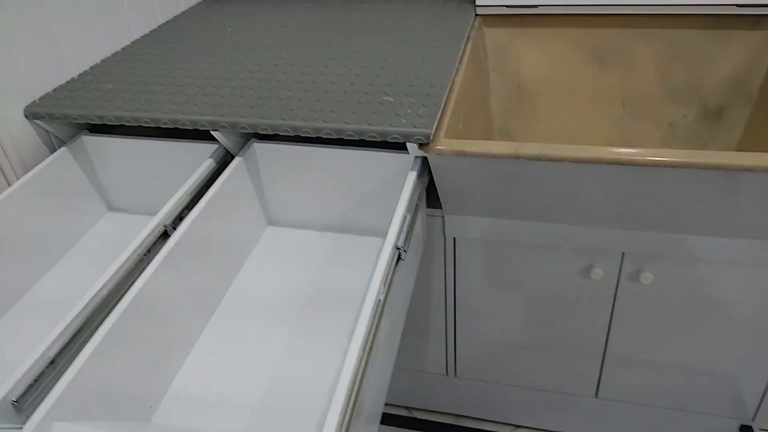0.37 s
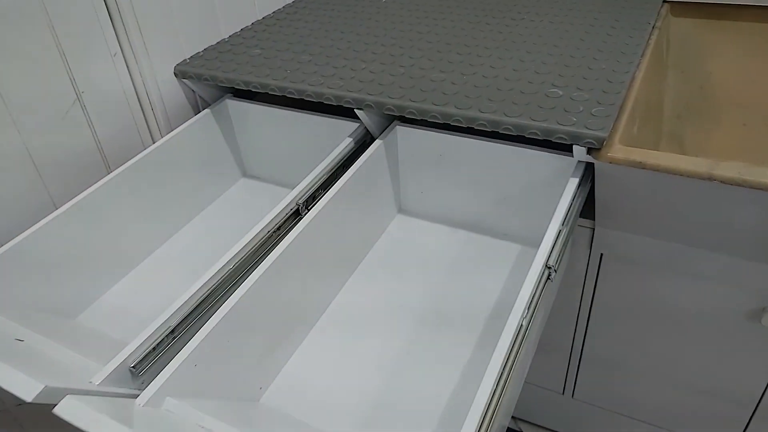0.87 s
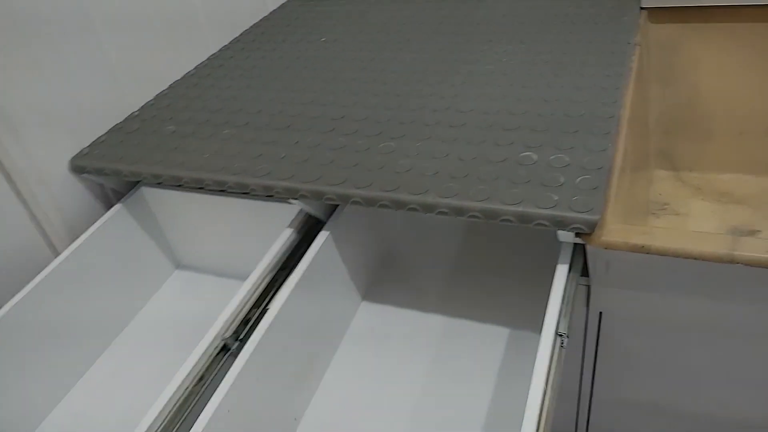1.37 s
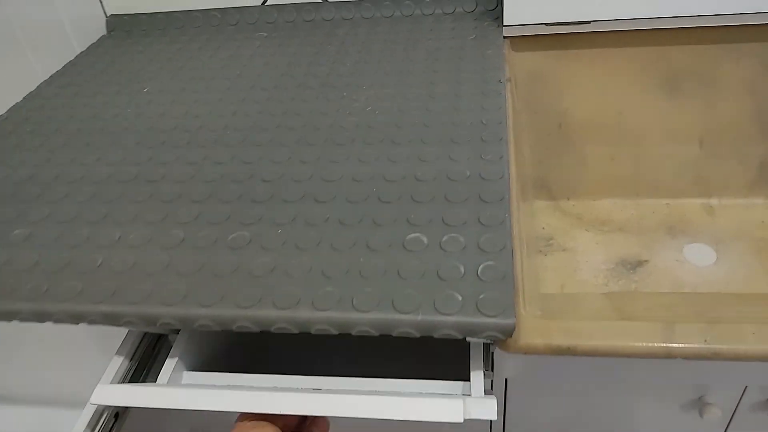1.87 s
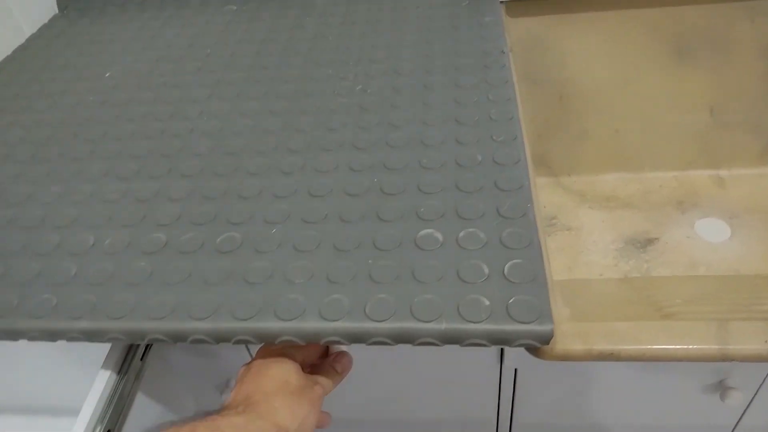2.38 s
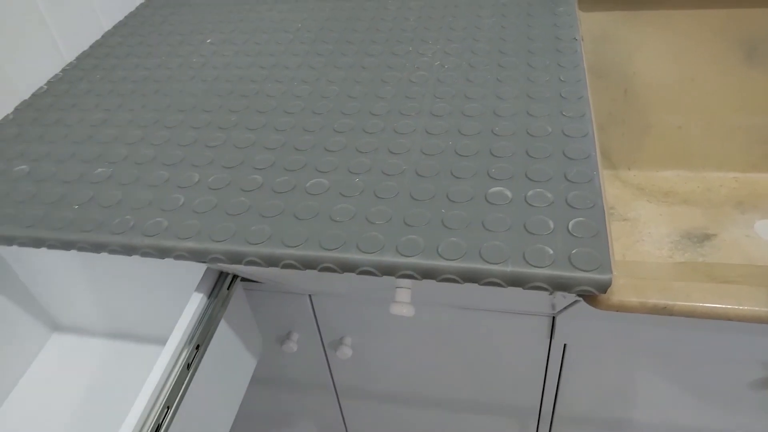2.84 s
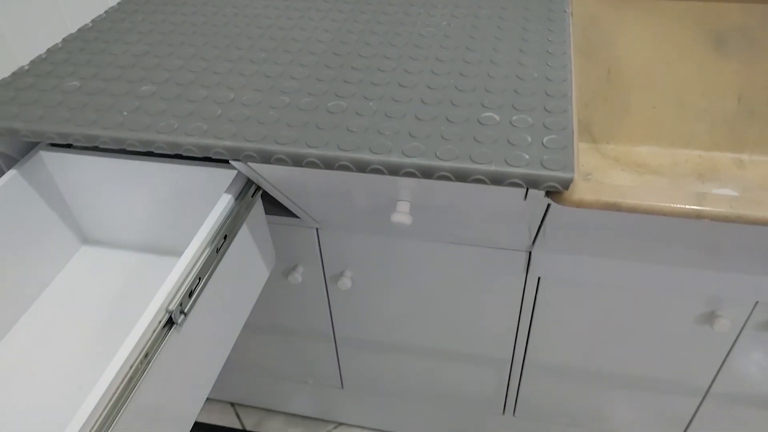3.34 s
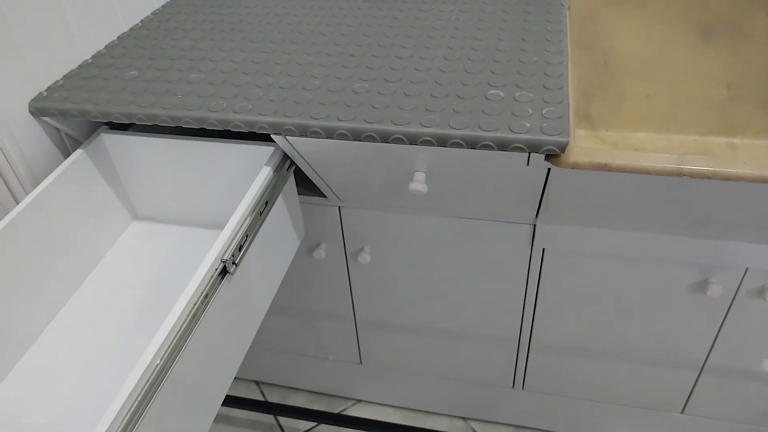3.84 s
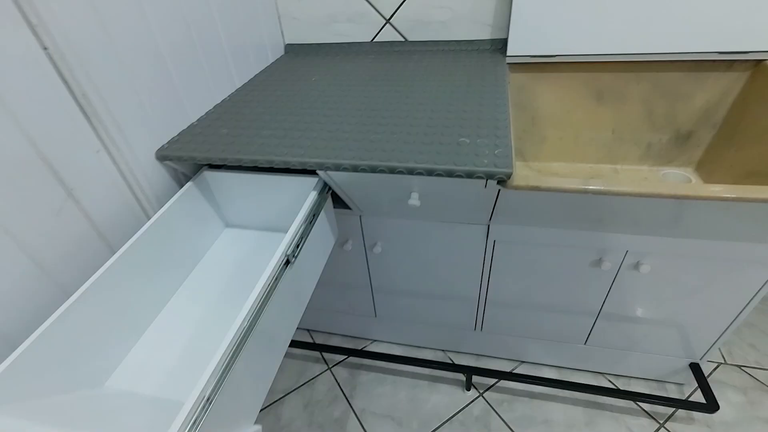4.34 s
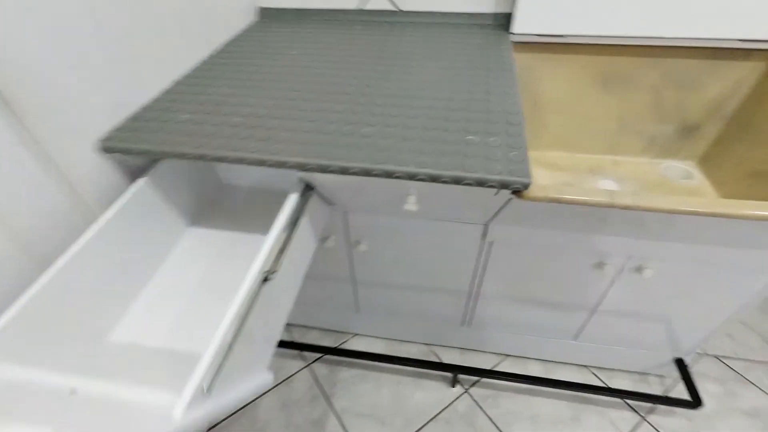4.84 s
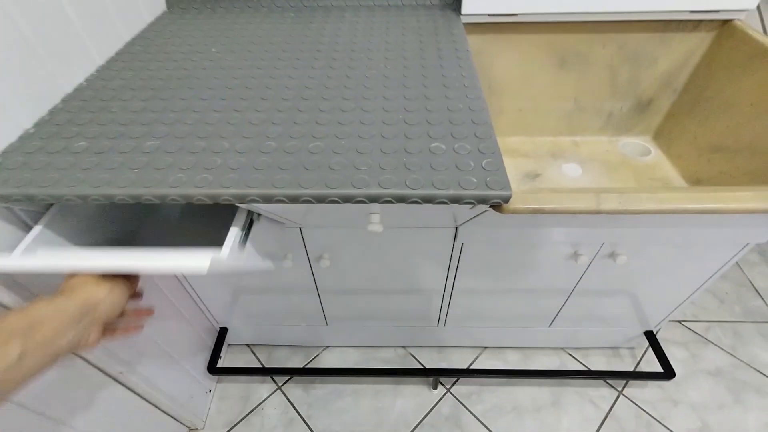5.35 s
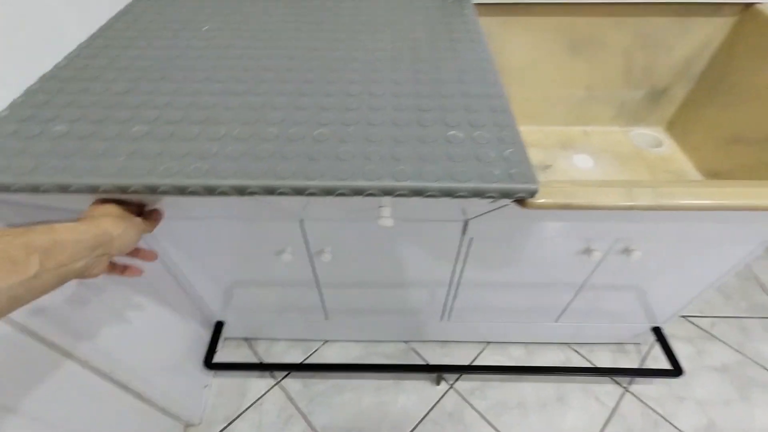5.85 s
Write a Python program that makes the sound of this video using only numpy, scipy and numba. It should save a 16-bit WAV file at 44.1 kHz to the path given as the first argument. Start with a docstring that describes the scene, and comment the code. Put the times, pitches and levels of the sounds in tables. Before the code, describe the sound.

A tiled room heard close through a hand-held phone in stereo. For the first second there is only soft room air, a thin wavering high whine that fades out at 1 s, and faint dull knocks. At about 1.03 s a light tap on wood starts the first drawer: a grainy rumble of steel balls swells from 1.2 s, bright metal clacks come at 1.65 to 1.75 s, and low wooden thumps cluster from 1.97 to 2.2 s, with a short echo. Then quiet air and clothes rustle, small hollow taps near 2.65 and 3.1 s, a tick and step near 3.65 s leaving a faint low ring, and more light ticks. From 4.64 s the second drawer is pushed with a knock and mid-pitched chatter, rolls, clacks sharply around 5.1 to 5.2 s, and lands with the loudest, deep boomy thuds from 5.53 to 5.75 s, dying away by the end.

```python
"""Quiet room air with a thin high whine and faint knocks, then two large wooden drawers are pushed shut.
Place: a tiled room, the hand-held phone close to the drawers, its two microphone ports left and right.
Filtered noise makes the air; soft pushes into resonances make knocks and steps, with echoes from the walls.
Noise grains on steel ball runners ring rails and boards as a rumble, and runner sections catch with clacks;
taps, bumps and landings are decaying, mostly low sine notes; loose runner parts chatter in bands of noise."""
import sys
import numpy as np
from scipy import signal
from scipy.io import wavfile
from scipy.ndimage import uniform_filter1d
from numba import njit

SR = 44100
rng = np.random.default_rng(int(sys.argv[2]) if len(sys.argv) > 2 else 0)


def volts_from_decibels(level):
    """Turn decibel levels (scalar or array-like) into linear amplitude factors."""
    exponent = np.asarray(level, float) / 20
    return 10 ** exponent


def unload_wav(signal):
    """Save mono or channel-first audio to the path in sys.argv[1] as 16-bit WAV at rate SR, clipped to [-1, 1]."""
    wavfile.write(
        sys.argv[1],
        SR,
        np.round(np.clip(np.atleast_2d(signal).T, -1, 1) * 32767).astype(np.int16),
    )


N = 263125
T = np.arange(N) / SR
SIDES = np.array([[1], [-1]])  # left, right


def curves(table):
    """Columns of a table that starts with seconds, one value a sample."""
    s, *columns = np.transpose(table)
    return [np.interp(T, s, c) for c in columns]


def unit(x):
    """Scale to rms 1."""
    return x / np.sqrt(np.mean(x ** 2))


def walk(rate):
    """Random levels held 1 / rate s and slewed twice, rms 1."""
    k = int(SR / rate)
    held = np.repeat(rng.standard_normal(N // k + 1), k)
    slewed = uniform_filter1d(uniform_filter1d(held, k), k)
    return unit(slewed[:N])


def grains(per_s, spread_db):
    """Ticks of uneven size at random times: balls running over grit, loose parts chattering."""
    sizes = volts_from_decibels(spread_db * rng.exponential(size=N)) * rng.standard_normal(N)
    return unit(sizes * (rng.random(N) < per_s / SR))


def ring(x, modes, lo_hz, hi_hz):
    """Modes struck by x, scaled by their noise power, then heard only in the band where the part radiates."""
    out, power = 0, 0
    for hz, width, db in modes:
        b, a = signal.iirpeak(hz, hz / width, fs=SR)
        out = out + volts_from_decibels(db) * signal.lfilter(b, a, x)
        power += volts_from_decibels(2 * db) * np.pi * width / SR
    band = signal.butter(2, [lo_hz, hi_hz], "bandpass", fs=SR, output="sos")
    return signal.sosfilt(band, out) / np.sqrt(power)


# Spectrum of the air. Each row: frequency in Hz, relative level in dB per Hz.
AIR_SPECTRUM = [(50, -12), (70, 8), (130, 4.5), (250, 4.5), (500, 0), (1000, -6), (2000, -13.5),
                (3500, -13), (5000, -16), (7500, -10.5), (11000, -27.5), (16000, -29.5)]
# Room air and rustle of clothes. Each row: time in seconds, level in dB, treble lift in dB,
# left minus right in dB.
RUSTLE_COURSE = [(0, -67, -0.5, -4), (.25, -71, 6.5, -2), (.8, -69, 1, -2), (1, -63, 4.5, -1),
                 (2.3, -57, 8.5, -3), (2.6, -61.5, 4, 1.5), (2.72, -60, 4, -3), (2.95, -69, 9, -1),
                 (3.15, -67, 9, -1), (3.58, -69, 9, -1), (3.8, -68, 9, -1), (4.08, -66, 10, -1),
                 (4.17, -69, 9, -1), (4.3, -66, 10, -1), (4.4, -68, 9, -1), (4.47, -65, 9, -1),
                 (4.58, -68, 8, 0), (4.66, -59.5, 0, 0.5), (5.97, -42, -7.5, -2)]


def air():
    """Noise bands half an octave apart flicker together and alone, more alike left and right in the bass."""
    level_db, lift_db, pan_db = curves(RUSTLE_COURSE)
    hz_at, db_at = np.transpose(AIR_SPECTRUM)
    out, swell = 0, walk(5.74)
    for hz in 50 * 2 ** np.arange(0, 8.4, .5):
        band = signal.butter(2, [hz * 2 ** -.25, hz * 2 ** 0.4], "bandpass", fs=SR, output="sos")
        mid, side = signal.sosfilt(band, rng.standard_normal((2, N)))
        treble = np.clip(np.log2(hz / 1300) / 0.31, 0, 1)
        db = np.interp(np.log(hz), np.log(hz_at), db_at) + treble * lift_db
        db = db + 0.9 * swell + 2.0 * walk(36)
        out = out + volts_from_decibels(db) * (mid + min(hz / 900, 1) * side * SIDES)
    # the first second sets the reference level
    return out / np.std(out[:, :SR]) * volts_from_decibels(level_db + SIDES * pan_db / 2)


def whine():
    """A thin, high, wavering sine tone that fades out."""
    hz, db = 7140, -87.5
    fade_from_s, fade_s = 1, 0.11
    fade = np.clip((fade_from_s - T) / fade_s + 1, 0, 1)
    return fade * volts_from_decibels(db + 2.7 * walk(16)) * np.sin(2 * np.pi * hz * T)


def hum():
    """A low ring after a step: noise in one narrow resonance that rises fast and dies away."""
    hz, width_hz, db = 158, 14, -56.5
    start_s, rise_s, t60_s = 3.72, 0.012, 1
    since = np.maximum(T - start_s, 0)
    shape = (1 - np.exp(-since / rise_s)) * volts_from_decibels(db - 60 * since / t60_s)
    return shape * ring(rng.standard_normal(N), [(hz, width_hz, -3)], 100, 260)


# Fingers on a front, steps and ticks. Each row: start in seconds, then relative levels of tick, thud
# and hollow note in dB, length of the push in ms.
KNOCK_EVENTS = [(0.059, -76, -62, -73, 2.9), (0.4706, -83, -58, -81, 3), (1.0272, -80, -66, -69, 3.4),
                (2.653, -78, -72, -58.5, 1.87), (3.0775, -79, -68, -50.5, 1.75),
                (3.084, -64, -54, -48, 1.57), (3.109, -80, -84, -46, 2.2), (3.6394, -51, -49, -62, 1.56),
                (3.707, -91, -53, -71.5, 1.36), (4.0671, -57, -64, -71.5, 0.76), (4.28, -81, -78, -57, 5.9),
                (4.4423, -64.5, -64, -72, 1.1), (4.612, -84, -75, -56, 3.8), (4.6318, -74, -50, -40.5, 2.3)]
# Resonances of floor, drawer front and tick. Each row: frequency in Hz, width in Hz, relative level in dB.
FLOOR_MODES = [(65.5, 20, 2), (109, 28, 4.5), (158, 16, -11), (254, 100, -5)]
FRONT_MODES = [(340, 28, 3), (441, 50, -3), (556.6, 26, 4), (650, 60, -4), (760, 110, 3), (888, 100, -3),
               (1100, 200, -15), (1590, 50, -12)]
TICK_MODES = [(1500, 700, 8), (2340, 660, 26.5), (4040, 780, 24), (4630, 560, 27), (7040, 2000, -16),
              (11100, 4000, -50)]


def knocks():
    """Single pushes: a thud in the floor, a hollow note of a drawer front, a dry tick."""
    settle_db, settle_s = 3, 0.012
    floor, front, tick = np.zeros((3, N))
    for s, tick_db, thud_db, note_db, push_ms in KNOCK_EVENTS:
        i = int(s * SR)
        # a longer, softer push wakes only the low modes
        push = np.hanning(int(push_ms * SR / 1000) + 2)
        push /= push.sum()
        floor[i:i + len(push)] = volts_from_decibels(thud_db + 30) * push
        front[i:i + len(push)] = volts_from_decibels(note_db + 40) * push
        # noise swells and fades as the front settles
        t = T[:SR // 8]
        settle = t / settle_s * np.exp(-t / settle_s) * rng.standard_normal(len(t))
        front[i:i + len(t)] += volts_from_decibels(note_db + settle_db) * settle
        t = T[:SR // 50]
        tick[i:i + len(t)] = volts_from_decibels(tick_db + 6.5) * rng.standard_normal(len(t)) * np.exp(-t / 0.0045)
    thud, note = ring(floor, FLOOR_MODES, 67, 380), ring(front, FRONT_MODES, 230, 1800)
    return thud + note + ring(tick, TICK_MODES, 800, 13000)


# Wooden notes: the tap at the first push, bumps on the way, boards landing. Each row: start in seconds,
# level before rise and pan in dB, starting note in Hz, time to fall 60 dB in seconds.
WOOD_NOTES = [(1.027, -39.5, 342, 0.11), (1.036, -42, 342, 0.044), (1.064, -43.5, 335, 0.1),
              (1.092, -46, 343, 0.079), (1.748, -17, 240, 0.07), (1.975, -12, 170, 0.043),
              (1.995, -14, 302, 0.045), (2.023, -12, 240, 0.093), (2.045, -19, 152, 0.19),
              (2.07, -11.5, 229, 0.076), (2.099, -19.5, 192.3, 0.23), (2.149, -19, 133, 0.21),
              (2.188, -21.5, 305, 0.17), (2.197, -22, 122.5, 0.44), (2.199, -19.5, 384, 0.065),
              (2.249, -21.5, 123.5, 0.22), (4.655, -29, 315.6, 0.2), (4.687, -32, 327, 0.13),
              (4.776, -30, 318, 0.2), (4.899, -21.5, 304, 0.083), (4.995, -23, 315, 0.16),
              (5.108, -20, 1450, 0.11), (5.143, -21.5, 149, 0.12), (5.191, -13, 195, 0.054),
              (5.197, -12.5, 787, 0.088), (5.533, -17.5, 248, 0.13), (5.558, -9.5, 168, 0.13),
              (5.605, -3.5, 163, 0.029), (5.627, -20.5, 188, 0.12), (5.661, -23, 140, 0.13),
              (5.702, -16.5, 344.3, 0.27), (5.707, -9.5, 149.7, 0.12), (5.716, -18.5, 258, 0.074),
              (5.727, -4, 90, 0.097), (5.737, -13.5, 131.7, 0.56), (5.763, -12, 130.7, 0.36),
              (5.848, -13, 119.5, 0.079)]


def thuds():
    """Each tap, bump or landing rings one wooden note, mostly low, that swells quickly and sinks a little."""
    rise_cycles, sag, pan_db = 0.38, 0.045, 2.5
    out, t = np.zeros((2, N)), T[:SR // 3]
    pans = rng.uniform(-0.65, 1, len(WOOD_NOTES))  # positive is left
    for (s, db, hz, t60), pan in zip(WOOD_NOTES, pans):
        i = int(s * SR)
        turns = hz * (t - sag * t ** 2 / t60)
        swell = 1 - np.exp(-t * hz / rise_cycles)
        note = volts_from_decibels(db - 60 * t / t60) * swell * np.sin(2 * np.pi * turns)
        out[:, i:i + len(t)] += volts_from_decibels(pan_db * pan * SIDES) * note[:N - i]
    return out


# Loose runner parts chatter around the blows and during the roll. Each row: start in seconds,
# hold in seconds, relative level in dB, centre in Hz, width in Hz.
CHATTER = [(1.651, .08, -43, 4300, 1090), (1.728, 0.078, -46.5, 4460, 1090),
           (4.634, 0.024, -52.5, 704, 350), (4.684, 0.084, -51, 730, 398), (4.798, 0.043, -42.5, 795, 250),
           (4.845, 0.11, -40, 770, 250), (4.888, 0.035, -49, 4100, 710), (5.001, .05, -39.5, 790, 249),
           (5.114, 0.072, -43, 3900, 1600), (5.19, 0.036, -51, 3570, 1600),
           (5.526, 0.056, -31.5, 2260, 895), (5.64, 0.051, -46, 2100, 696),
           (5.681, 0.094, -41.5, 7300, 2230)]


def rattles():
    """Dense uneven ticks in a band rise, hold and die away; part of them differs left and right."""
    rise_s, t60_s = 0.00577, 0.11
    out, t = np.zeros((2, N)), T[:SR // 3]
    ticks = np.array([grains(2200, 1.8) for _ in range(2)])  # ticks per second, spread in dB
    for s, hold, db, hz, width in CHATTER:
        i = int(s * SR)
        fall = volts_from_decibels(db - 60 * np.maximum(t - hold, 0) / t60_s)
        shape = fall * (1 - np.exp(-t / rise_s))
        sos = signal.butter(2, [hz - width / 2, hz + width / 2], "bandpass", fs=SR, output="sos")
        mid, side = unit(signal.sosfilt(sos, ticks[:, i:i + len(t)]))
        out[:, i:i + len(t)] += shape[:N - i] * (mid + 0.69 * side * SIDES)
    return out


# How hard each drawer rolls, one list a drawer from first push to stop. Each row: time in seconds,
# push level in dB, lift of rails and balls in dB.
ROLL_COURSES = [
    [(1.04, -63, -7), (1.12, -57.5, 3), (1.22, -46, 0.5), (1.3, -35, -3.5), (1.36, -35, -1), (1.43, -34, 3),
     (1.5, -36, -2), (1.6, -31.5, -2), (1.7, -33, -1.5), (1.8, -33, -2), (1.93, -38, -0.5),
     (2.03, -30.5, -3), (2.2, -35.5, -1.5)],
    [(4.64, -48.5, -7), (4.72, -39.5, -2), (4.8, -42, 4), (4.84, -43, 6), (4.9, -36, 0), (5.0, -34.5, 3),
     (5.1, -33.5, 0.5), (5.2, -35, -3.5), (5.3, -34, 4), (5.4, -35.5, 3.5), (5.5, -36, -2), (5.55, -36, 12),
     (5.72, -38.5, 2)],
]
# Settings of the four parts. Each row: carcass, boards, rails, balls.
# Level in dB with the drawer far out.
FAR_OUT_DB = (-8, -1, -7.5, -25)
# Gain in dB as the drawer travels home into the carcass.
HOME_GAIN_DB = (10, -2.5, 3.5, -10.5)
# Gain in dB per dB of push: the carcass swells most.
PUSH_SLOPE = (2.6, 1.04, 1.34, 1.45)


def rolling():
    """Balls run over grit and shake each part, louder with push, the carcass most of all; the level flickers."""
    full_roll_db, fade_s = -30.5, 0.022
    level = np.zeros((4, N))
    for course in ROLL_COURSES:
        start, stop = course[0][0], course[-1][0]
        fade = np.clip(np.minimum(T - start, stop - T) / fade_s, 0, 1)
        travel = np.clip((T - start) / (stop - start), 0, 1)
        push_db, lift_db = curves(course)
        db = full_roll_db + np.outer(PUSH_SLOPE, push_db - full_roll_db)
        db += np.outer((0, 0, 1, 1), lift_db)
        db += np.array(FAR_OUT_DB)[:, None] + np.outer(HOME_GAIN_DB, travel)
        level += fade * volts_from_decibels(db)
    noise = np.array([grains(5000, 2) for _ in range(2)])  # grains per second, spread in dB
    force = (level * volts_from_decibels(1.3 * walk(45)))[:, None] * noise
    # rolling contact is soft, so it lacks the top that a steel clack has
    force[3] = signal.sosfilt(signal.butter(2, 3670, fs=SR, output="sos"), force[3])
    # rolling balls are too light to move the wood in the deep bass
    force[:2] = signal.sosfilt(signal.butter(2, 132, "high", fs=SR, output="sos"), force[:2])
    return force


# Blows. Each row: start in seconds, then relative levels of steel, boards and carcass in dB, base time
# in seconds for the rattle to fall 60 dB.
BLOW_EVENTS = [(1.125, -64, -49.5, -67, 0.092), (1.19, -47, -58, -45.5, 0.071),
               (1.3833, -37.5, -36.5, -42.5, 0.38), (1.656, -15.5, -53, -52, 0.064),
               (1.698, -29, -36, -44, 0.21), (1.7427, -20.5, -25, -38, 0.096),
               (1.9717, -31, -24, -21, 0.046), (2.0189, -23, -31, -16, 0.12),
               (2.0892, -44, -30.5, -27, 0.15), (2.14, -42, -50, -32, 0.057),
               (2.188, -27.5, -30, -21.5, 0.18), (4.653, -43.5, -63, -41, 0.071),
               (4.6816, -45.5, -61, -36, 0.16), (4.7489, -44, -45, -57, 0.034),
               (4.853, -51, -35, -59, 0.076), (4.8905, -36, -33.5, -72, 0.39),
               (5.1054, -13, -33, -30, 0.095), (5.1483, -33, -36, -20, 0.066),
               (5.1905, -15, -32, -36, 0.065), (5.199, -35, -18, -25, 0.055),
               (5.5299, -23.5, -21.5, -10.5, 0.041), (5.5555, -30, -19, -7, 0.041),
               (5.579, -33.5, -28.5, -36, 0.12), (5.6084, -53, -26, -16, 0.08), (5.7, -20, -16, -8, 0.13),
               (5.7399, -27.5, -21.5, -12, 0.037)]
# Settings of the four parts. Each row: carcass, boards, rails, balls.
# How well each part passes a blow to the air, in dB.
PASS_DB = (-2, -3.5, -9.5, -14.5)
# How many times the base time each part shakes.
SHAKE_TIMES = (2.2, 3.1, 3.37, 2.17)
# Time constant of the rise in seconds: the big parts move late.
RISE_S = (0.0071, 0.0062, 0.0017, 0.00032)
# Extra level of the first contact in dB.
CONTACT_DB = (3.4, 1.5, 8.3, 1.6)
# What the rails take of a blow, in dB. Row: from the steel, from the boards.
RAILS_TAKE_DB = (-5.5, -5)


def add_blows(force):
    """Each blow is noise: a hard first contact, then a rattle that dies away at each part's own pace."""
    contact_s = 0.0046
    t = T[:SR // 3]
    rise = 1 - np.exp(-t / np.array(RISE_S)[:, None])
    contact = volts_from_decibels(CONTACT_DB)[:, None] * np.exp(-t / contact_s)
    for s, steel_db, boards_db, carcass_db, t60 in BLOW_EVENTS:
        i = int(s * SR)
        from_steel, from_boards = volts_from_decibels(np.add((steel_db, boards_db), RAILS_TAKE_DB))
        rails_db = 20 * np.log10(np.hypot(from_steel, from_boards))
        db = np.array([carcass_db, boards_db, rails_db, steel_db]) + PASS_DB
        rattle = volts_from_decibels(-60 * t / (t60 * np.array(SHAKE_TIMES)[:, None]))
        shape = volts_from_decibels(db)[:, None] * (rattle + contact) * rise
        blow = shape[:, None] * rng.standard_normal((2, len(t)))
        force[..., i:i + len(t)] += blow[..., :N - i]


# What each part rings with. Each row: frequency in Hz, width in Hz, relative level in dB.
CARCASS_MODES = [(70, 12, -17), (102.5, 5, -7.5), (139.4, 8.8, 1.5), (196.4, 43, -2.5)]
BOARD_MODES = [(240, 58, -5.5), (290.3, 69, 3), (336.6, 36, 5), (413, 80, 1.5), (458, 63, -0.5),
               (513, 54, -10)]
RAIL_MODES = [(690, 45, -3.5), (782, 81, 5), (901, 132, 1), (1112, 394, -0.5), (1310, 30, -4.5),
              (1450, 100, -7), (1625, 176, -10.5), (1970, 240, -11.5), (2427, 220, -10)]
BALL_MODES = [(2776, 180, 13), (3040, 260, 13), (3450, 280, 5.5), (3965, 540, 6.5), (4314, 61, 7.5),
              (4820, 420, 0.5), (5740, 1400, 2), (7380, 2000, -11), (8450, 1400, -10), (12700, 2500, -19.5)]
# Where carcass, boards, rails and balls radiate. Each row: lower edge in Hz, upper edge in Hz.
RADIATION_BANDS = ((50, 184), (180, 466), (500, 3240), (2200, 11100))
# Share that differs left and right. Row: carcass, boards, rails, balls.
SIDE_SHARE = (0.1, 0.12, 0.53, 0.73)


def drawers():
    """Rolling and blows ring carcass, boards, rails and balls; wood moves as one body, steel sounds wider."""
    force = rolling()
    add_blows(force)
    out = rattles()
    parts = (CARCASS_MODES, BOARD_MODES, RAIL_MODES, BALL_MODES)
    for (mid, side), modes, band, share in zip(force, parts, RADIATION_BANDS, SIDE_SHARE):
        out = out + ring(mid + share * side * SIDES, modes, *band)
    return out


@njit
def walls(x, lags, gain, damp, drift, turn):
    """Eight delay lines feed each other, duller each round; lengths drift slowly, so no fixed tone rings on."""
    line, soft, out = np.zeros((8, 4096)), np.zeros(8), np.zeros((2, len(x)))
    for i in range(len(x)):
        total = 0.
        for k in range(8):
            late = lags[k] + drift * np.sin(turn * (1 + k / 5) * i + k)
            j = int(late)
            part = late - j
            echo = (1 - part) * line[k, (i - j) & 4095] + part * line[k, (i - j - 1) & 4095]
            soft[k] += (1 - damp) * (gain[k] * echo - soft[k])
            total += soft[k]
            out[k % 2, i] += soft[k]
        for k in range(8):
            line[k, i & 4095] = x[i] + soft[k] - total / 4
    return out


def room(slide, notes, taps, drop_db):
    """Tiled walls answer, wide in the treble, alike and weaker in the bass."""
    t60_s, damp = 0.55, 0.34  # t60 before the damping
    drift_ms, drift_hz = 0.35, 1.3  # of the first line; the others drift faster
    lags = np.array([601, 787, 953, 1171, 1367, 1583, 1831, 2069])  # samples
    gain = volts_from_decibels(-60 * lags / SR / t60_s)
    motion = drift_ms * SR / 1000, 2 * np.pi * drift_hz / SR
    # wooden notes and knocks reach the walls more weakly than the rolling; the left signal feeds them
    closing = slide[0] + volts_from_decibels(-6.5) * notes[0]
    wet = volts_from_decibels(drop_db) * walls(closing, lags, gain, damp, *motion)
    wet = wet + volts_from_decibels(-6) * walls(taps, lags, gain, damp, *motion)
    mid, side = (wet[0] + wet[1]) / 2, (wet[0] - wet[1]) / 2
    side = signal.sosfilt(signal.butter(2, 840, "high", fs=SR, output="sos"), side)
    mid = signal.sosfilt(signal.butter(1, 170, "high", fs=SR, output="sos"), mid)
    return volts_from_decibels(-6) * (0.71 * mid + side * SIDES)


# The tail after each closing drops away. Each row: start in seconds, depth in dB before the return.
TAIL_DROPS = [(2.315, -7.5), (5.797, -1), (5.87, -1), (5.94, -46)]
# Where the sound stands. Each row: time in seconds, left minus right in dB, left lag in ms.
STEREO_PLACE = [(0, -5.5, -0.14), (2.2, 1, -0.085), (3, -1.5, -0.39), (5.97, 0, -0.2)]


def scene():
    """Direct sound reaches the two ports a little apart, over the echoes of the room and its air."""
    slide, notes, taps = drawers(), thuds(), knocks() + hum()
    drop_s, return_s = 0.03, 1
    drop_db = 0
    for s, db in TAIL_DROPS:
        drop_db = drop_db + db * np.clip((T - s) / drop_s, 0, 1) * np.exp(-np.maximum(T - s, 0) / return_s)
    near = (slide + notes) * volts_from_decibels(drop_db) + taps
    pan_db, lag_ms = curves(STEREO_PLACE)
    direct = np.array([np.interp(T - side * lag_ms / 2000, T, x) for side, x in zip((1, -1), near)])
    placed = (direct + room(slide, notes, taps, drop_db)) * volts_from_decibels(SIDES * pan_db / 2)
    ports = placed + air() + whine()
    # around 8 kHz the left port is shaded and the right slightly lifted
    b, a = signal.iirpeak(8000, 1.5, fs=SR)
    return ports - np.array([[.4], [-.1]]) * signal.lfilter(b, a, ports)


def top_cut(x):
    """Nothing passes above the cut-off."""
    return signal.sosfilt(signal.butter(12, 16480, fs=SR, output="sos"), x)


def record(dry):
    """The phone drops the deepest bass and rounds the loudest peaks."""
    x = signal.sosfilt(signal.butter(4, 55, "high", fs=SR, output="sos"), dry)
    rounded = np.tanh(1.446 * x) / 1.353
    return top_cut(rounded)


dry = scene()
out = record(dry)
unload_wav(out)
```